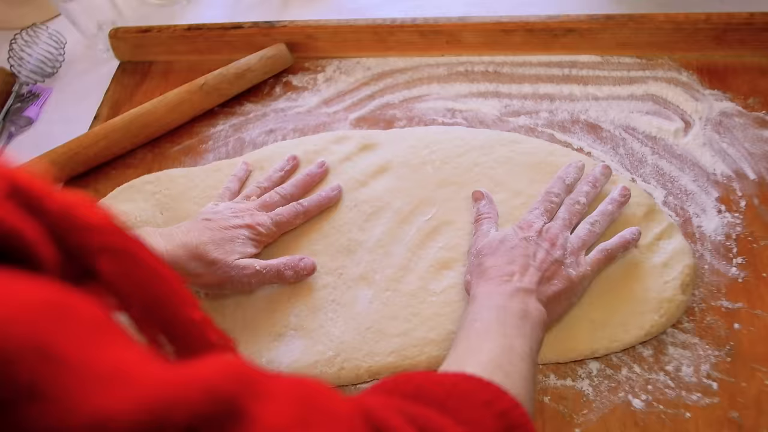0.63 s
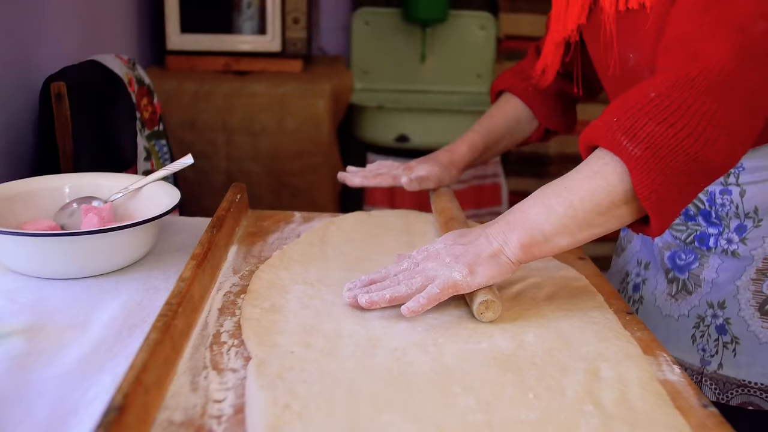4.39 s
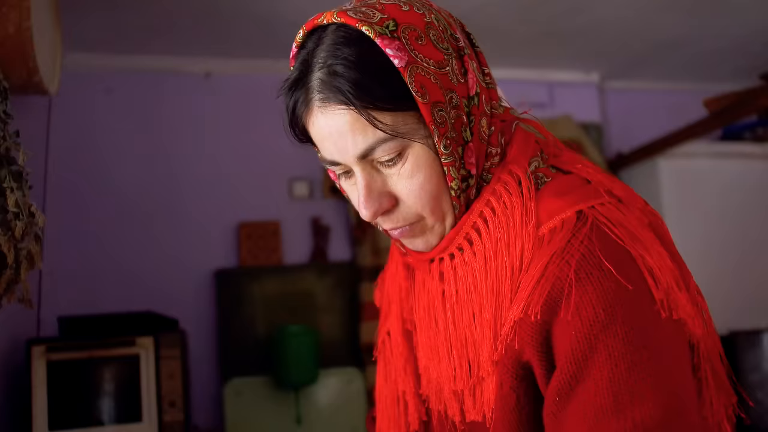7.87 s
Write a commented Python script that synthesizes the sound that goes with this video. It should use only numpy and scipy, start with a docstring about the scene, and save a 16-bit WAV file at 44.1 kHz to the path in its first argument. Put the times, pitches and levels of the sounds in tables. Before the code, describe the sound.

Hands pat and rub dough on a floured wooden board with low thumps and gritty swishes, then a wooden rolling pin rolls lightly, close up.

```python
"""A dull wooden knock and a hiss of flour, then hands pat and smooth dough on a board and roll it with a wooden pin.
Pushes set the board's modes booming; knocks and ticks are brief noise contacts, some ringing the wood.
Palms, skids and pin are shaped flour noise and wood scuff; the pin sings through its own modes, skin squeaks faintly.
A small kitchen answers the blows with short feedback echoes, over a quiet noise floor."""
import sys
import numpy as np
from scipy import signal
from scipy.fft import rfft, irfft, next_fast_len
from scipy.io import wavfile
from scipy.ndimage import map_coordinates

SR = 44100
rng = np.random.default_rng(int(sys.argv[2]) if len(sys.argv) > 2 else 0)


def dump_mix(stems):
    """Bounce the given channels to the path in sys.argv[1] as a 16-bit WAV at rate SR."""
    frames = np.atleast_2d(stems).T  # one column per channel
    limited = np.clip(frames, -1, 1)  # hard clip at full scale
    pcm = np.round(limited * 32767).astype(np.int16)
    wavfile.write(sys.argv[1], SR, pcm)


def voltage_ratio(level):
    """Linear amplitude factor for a level in decibels (scalar or array-like)."""
    return 10 ** (np.asarray(level, float) / 20)


N = 381024

# noise floor, tone colour: f/Hz, level per Hz/dB
QUIET_COLOUR = [(30, 5.5), (60, 12.5), (120, -13), (300, -14), (700, -17), (2000, -12.5), (8000, -21.5),
                (16000, -26)]
# flour hiss, tone colour: f/Hz, level per Hz/dB
FLOUR_COLOUR = [(1300, -2.5), (1800, -5), (2300, 6), (3200, -5), (4200, -1.5), (5600, -2), (11000, -10),
                (16000, -17)]
# scuff on the wood, tone colour: f/Hz, level per Hz/dB
SCUFF_COLOUR = [(300, -7.5), (700, -11.5), (1400, -17), (2800, -20.5)]
# modes of the floured board: f/Hz, level/dB, t60/s
BOARD_MODES = [(52.2, -21.5, 0.97), (82.6, -3, 0.37), (106.9, -3.5, 0.55), (151.1, 1.5, 0.11),
               (170.3, -5.5, 0.28), (195.5, -5.5, 0.15), (239, -4, 0.065), (295.4, -5.5, 0.12),
               (362, -8, 0.033), (424.3, -12, 0.088)]
# modes of knocked wood: f/Hz, level/dB, t60/s
WOOD_MODES = [(307, -2, .22), (528, -10, .12), (787, -3, .11), (1087, -8, .12), (1150, -2, .1),
              (1326, -5, .11), (1500, -4, .07), (1680, -7, .06), (2270, -10, .06), (2790, -13, .06)]
# modes of the rolling pin: f/Hz, level/dB, t60/s
PIN_MODES = [(872, -7, .07), (2010, 2, .036), (2790, -4, .008), (3400, 1, .022), (4910, -5, .02),
             (6520, -8, .016), (8090, -13, .014)]
# steady pressing stirs the board: t/s, rumble level/dB
LOAD_CURVE = [(0.0, -41), (1.73, -23), (2.45, -41.5), (2.76, -34), (3.7, -47.5), (4.35, -48), (5.03, -59.5),
              (5.44, -45), (5.74, -57), (5.95, -31), (6.13, -52), (6.5, -39.5), (7.3, -47.5), (8.0, -40.5),
              (8.36, -45.5), (8.64, -49)]
# skin squeaks along dough or pin: start t/s, stop t/s, level/dB, start f/Hz, stop f/Hz
SQUEAK_GLIDES = [(0.844, 0.892, -26, 3350, 3080), (2.89, 3.105, -43.5, 2630, 2790),
                 (3.062, 3.11, -39, 1193, 1184), (6.214, 6.375, -46, 2860, 2570)]
# small ticks and slaps: t/s, body level/dB, treble level against the body/dB, t60/s, body f/Hz
TICK_HITS = [(0.4205, -32, -1, 0.027, 2250), (0.7651, -16.5, -30, 0.075, 2160),
             (1.015, -17, -6.5, 0.031, 2240), (1.0997, -37, -24, 0.023, 1540),
             (1.3765, -7, -50, 0.024, 2650), (1.495, -18.5, -43, 0.057, 2960),
             (1.667, -5.5, -23, 0.015, 3300), (2.569, -14, -16, 0.026, 3200),
             (2.865, -42, 15.5, 0.017, 2600), (2.9725, -10.5, -15, 0.016, 2930),
             (3.109, -32.5, 19.5, 0.016, 3450), (3.1437, -13, -0.5, 0.021, 1980),
             (4.409, -33.5, 0, 0.052, 3170), (4.418, -27, -17, 0.023, 1880),
             (4.4855, -40.5, 16, 0.012, 1810), (4.7248, -25.5, -10, 0.091, 2980),
             (4.762, -14.5, -5, 0.042, 2670), (4.771, -24, -14, 0.15, 2640), (4.8162, -56, 28, 0.013, 3030),
             (5.094, -23, -12, 0.024, 2230), (5.292, -41, 6, 0.029, 3000), (5.31, -36, 2, 0.03, 2010),
             (5.7991, -21.5, -7, 0.023, 2150), (5.923, -42, 18.5, 0.019, 1920),
             (6.1616, -32.5, 1, 0.049, 3250), (6.178, -25.5, -6, 0.038, 1970),
             (6.532, -37.5, 18.5, 0.028, 3470), (6.9265, -32, -6, 0.022, 2120),
             (7.339, -35.5, 16, 0.023, 3140), (7.412, -46.5, 23, 0.018, 2050), (8.562, -28, -2, 0.03, 1500),
             (8.606, -39, -20, 0.024, 1500)]
# dull wooden knocks: t/s, level/dB, contact length/s, brightness/(dB per octave)
KNOCK_HITS = [(0.008, -20.5, 0.0021, -7), (0.141, -14.5, 0.0052, -4.5), (0.159, -21, 0.0035, 0),
              (0.662, -25.5, 0.023, -3.5), (2.32, -30, 0.029, 2.5), (2.365, -22, 0.0092, -9),
              (2.511, -22, 0.018, -3.5), (5.466, -25, 0.022, -6.5), (5.861, -24, 0.027, -3),
              (5.922, -18.5, 0.032, -2.5), (6.64, -29, 0.022, -7.5), (7.47, -25.5, 0.13, 3),
              (7.994, -25.5, 0.033, 6), (8.382, -13.5, 0.043, -0.5)]
# a hand or the pin lands and skids to rest: t/s, fall/s, flour hiss level/dB, scuff level/dB
SKID_STROKES = [(0.421, 0.052, -30, -32), (0.505, 0.28, -47, -35), (0.668, 0.16, -36, -29.5),
                (0.693, 0.056, -34.5, -19.5), (0.747, 0.024, -43, -22), (0.767, 0.068, -53, -16.5),
                (1.1, 0.13, -36.5, -24.5), (1.374, 0.083, -27, -26), (1.493, 0.11, -41, -28),
                (1.67, 0.03, -24, -13.5), (1.758, 0.13, -45, -27.5), (2.323, 0.1, -58, -30.5),
                (2.568, 0.32, -30, -25.5), (2.941, 0.96, -36, -37), (3.13, 0.08, -28.5, -22.5),
                (4.419, 0.49, -46, -43), (5.312, 0.1, -36.5, -33), (5.774, 0.011, -33.5, -42),
                (5.797, 0.51, -42, -35.5), (5.922, 0.059, -30, -23), (6.189, 0.1, -28, -35),
                (6.712, 0.093, -33.5, -30.5), (6.925, 0.034, -35, -38.5), (7.338, 0.066, -33, -31.5),
                (8.387, 0.067, -64, -26)]
# a cupped palm wipes across and lifts off: start t/s, stop t/s, flour hiss level/dB, scuff level/dB,
# hollow level/dB, hollow f/Hz at start, hollow f/Hz at stop
PALM_WIPES = [(0.138, 0.313, -27.5, -27, -30, 2380, 2636), (0.872, 1, -23.5, -42.5, -44, 3220, 2500),
              (2.055, 2.252, -33, -36.5, -34.5, 2577, 2864)]
# the pin is drawn along: fastest t/s, rise/s, fall/s, flour hiss level/dB, scuff level/dB, pin song level/dB
PIN_STROKES = [(3.08, 0.11, 0.16, -59, -40, -35), (4.53, 0.062, 0.15, -50, -64, -42),
               (4.69, 0.091, 0.21, -66, -59, -43.5), (5.0, 0.14, 0.14, -56, -77, -44.5),
               (5.105, 0.092, 0.042, -40.5, -65, -35.5), (5.41, 0.033, 0.076, -48, -43.5, -60),
               (5.555, 0.26, 0.05, -46, -45.5, -46), (5.662, 0.067, 0.039, -47, -50, -40),
               (5.815, 0.046, 0.024, -59, -53, -42), (6.03, 0.015, 0.012, -38, -69, -47),
               (6.21, 0.057, 0.27, -47, -50, -43.5), (6.385, 0.016, 0.035, -36, -35, -39),
               (6.435, 0.051, 0.063, -33, -50, -34), (6.545, 0.11, 0.2, -51, -47, -48),
               (6.71, 0.066, 0.081, -47.5, -51, -40.5), (7.05, 0.17, 0.25, -46.5, -42, -53.5),
               (7.59, 0.049, 0.069, -34.5, -70, -41), (7.66, 0.049, 0.072, -37.5, -72, -38),
               (7.92, 0.16, 0.49, -43.5, -49, -42.5), (8.19, 0.1, 0.079, -41.5, -44.5, -53),
               (8.3, 0.081, 0.11, -44, -57.5, -49.5), (8.516, 0.066, 0.21, -42.5, -52, -41)]
# palms slide over the dough: fastest t/s, rise/s, fall/s, flour hiss level/dB, scuff level/dB, hollow level/dB
PALM_STROKES = [(0.0, .05, 0.06, -33, -33, -61), (.595, 0.048, 0.042, -41, -29, -51),
                (1.237, 0.065, 0.17, -48.5, -44.5, -43), (1.596, 0.2, 0.043, -44.5, -37, -50),
                (1.806, 0.073, 0.12, -36, -52, -38.5), (2.76, 0.043, 0.055, -40, -60, -73),
                (3.222, 0.033, 0.032, -30, -36, -42), (3.4, 0.053, 0.16, -52, -46, -41),
                (3.53, 0.081, 0.088, -28.5, -32, -25.5), (3.61, 0.18, 0.072, -30.5, -33.5, -26),
                (3.76, 0.31, 0.08, -42.5, -46, -56), (4.1, 0.17, 0.17, -46, -50.5, -51),
                (4.24, 0.16, 0.018, -49.5, -53, -67)]
# pushes on the board: t/s, level/dB, firmness/(dB per octave)
BOARD_PUSHES = [(0.417, -27, 4), (0.592, -27, -10), (0.695, -7, 6.5), (0.747, -23.5, 4), (0.894, -9.5, 2.5),
                (1.011, -22, 9), (1.029, -3, 3), (1.21, -12.5, 3.5), (1.385, -5, 4.5), (1.565, -5.5, 4),
                (1.67, -2.5, 6), (1.728, -12.5, 3.5), (1.772, -19.5, 8), (1.845, -14, 2),
                (1.886, -25.5, 10), (1.952, -17.5, -7), (2.02, -22, 12), (2.18, -15, 7), (2.315, -32, 15),
                (2.569, -4.5, 5.5), (2.97, -10, 3), (3.126, -10, 7), (3.55, -8.5, -6.5), (4.251, -33, 12),
                (4.415, -15, -6.5), (5.09, -10.5, -5), (5.314, -20, -6), (5.779, -22.5, -17),
                (5.799, -19, -4.5), (5.916, -19.5, 5.5), (6.179, -15.5, 0.5), (6.316, -25, 3.5),
                (6.714, -6.5, -5), (6.93, -26, -13), (7.337, -16.5, -5.5), (7.511, -28.5, -3),
                (7.79, -25.5, -5.5), (7.844, -18, -11), (7.99, -18, 8), (8.56, -10.5, -6),
                (8.6, -3.5, -10.5)]

EDGE_DB = 20   # rise, fall and edge times are counted to this far below the top
SLIDE_ROUNDNESS, STOP_ROUNDNESS = 2.2, 1.86   # exponents of the swell and the dying away
WIPE_SCUFF_SHARE_DB, WIPE_LOW_DB = 1, -11   # fingertip rasp; wipes stir little below it


def rms_one(x):
    """Scale to rms 1."""
    return x / np.sqrt(np.mean(x ** 2) + 1e-20)


def band(x, low_hz, high_hz):
    """Second-order band-pass."""
    return signal.sosfilt(signal.butter(2, [low_hz, min(high_hz, .45 * SR)], "band", fs=SR, output="sos"), x)


def drift(rate_hz):
    """Slow random wander of rms 1, computed at every 40th sample."""
    r = np.exp(-80 * np.pi * rate_hz / SR)
    slow = signal.lfilter([1], [1, -2 * r, r * r], rng.standard_normal(N // 40 + 2002))[2000:]
    return np.interp(np.arange(N) / 40, np.arange(len(slow)), rms_one(slow))


def coloured(x, spectrum, patchy_db):
    """Half-octave bands of two noises in turn, each with its own level and flicker; rms 1."""
    hz, db = np.transpose(spectrum)
    edges = 25 * 2 ** np.arange(0, 9.6, .5)
    out = np.zeros(N)
    for k, (low, high) in enumerate(zip(edges, edges[1:])):
        if high > hz[0] and low < hz[-1]:
            level_db = np.interp(np.log(low * high) / 2, np.log(hz), db)
            out += voltage_ratio(level_db + patchy_db * drift(11.0)) * band(x[k % 2], low, high)
    return rms_one(out)


def grit(per_s, share):
    """Noise with flour grains on top, two unrelated draws."""
    grains = (rng.random((2, N)) < per_s / SR) * rng.laplace(0, 1, (2, N))
    return rng.standard_normal((2, N)) + share * rms_one(grains)


def sustained(force, modes, flicker_db):
    """A running force keeps the modes ringing, each with its own random flicker; rms 1."""
    out = np.zeros(N)
    for hz, level_db, t60 in modes:
        r, w = voltage_ratio(-60 / (t60 * SR)), 2 * np.pi * hz / SR
        ringing = rms_one(signal.lfilter([1], [1, -2 * r * np.cos(w), r * r], force))
        out += voltage_ratio(level_db + flicker_db * drift(19.0)) * ringing
    return rms_one(out)


def struck(modes, contact, tilt_db, scatter_db, length_s=0.54):
    """One blow: the modes ring from a contact force, tilted about the second mode; peak 1."""
    t = np.arange(int(length_s * SR)) / SR
    hz, level_db, t60 = np.transpose(modes)[:, :, None]
    strength_db = level_db + tilt_db * np.log2(hz / hz[1]) + scatter_db * rng.standard_normal(hz.shape)
    signs = (-1.) ** np.arange(len(hz))[:, None]
    ringing = np.sum(signs * voltage_ratio(strength_db - 60 * t / t60) * np.sin(2 * np.pi * hz * t), axis=0)
    blow = signal.fftconvolve(ringing, contact)[:len(t)]
    return blow / np.max(np.abs(blow))


def add(out, s, sound):
    """Mix a sound in at a time."""
    i = max(round(s * SR), 0)
    out[i:i + len(sound)] += sound[:max(N - i, 0)]


def in_time(rows):
    """Each column of a curve at every sample."""
    s, *columns = np.transpose(rows)
    return [np.interp(np.arange(N) / SR, s, c) for c in columns]


def strokes(rows, roundness, stop_roundness):
    """Power of each level column in time: every stroke swells to its top and dies away."""
    out = np.zeros((len(rows[0]) - 3, N))
    for s, rise_s, fall_s, *levels_db in rows:
        rise_s, fall_s = max(rise_s, .005), max(fall_s, .005)
        i = np.arange(max(int((s - 3 * rise_s) * SR), 0), min(int((s + 3 * fall_s) * SR), N))
        distance_s = np.abs(i / SR - s)
        swell = (distance_s / rise_s) ** roundness
        dying = (distance_s / fall_s) ** stop_roundness
        away = np.where(i / SR < s, swell, dying)
        out[:, i] += voltage_ratio(np.array(levels_db)[:, None] - EDGE_DB * away) ** 2
    return out


def slow_pair(cut_hz):
    """Two low-passed noises that turn into narrow noise once carried on a pitch."""
    low_pass = signal.butter(2, cut_hz, fs=SR, output="sos")
    return rms_one(signal.sosfilt(low_pass, rng.standard_normal((2, N))))


def gliding(air, start, stop, start_hz, stop_hz):
    """Narrow noise around a pitch that glides from start to stop."""
    pitch_hz = np.interp(np.arange(N) / SR, [start, stop], [start_hz, stop_hz])
    phase = 2 * np.pi * np.cumsum(pitch_hz) / SR
    return air[0] * np.cos(phase) + air[1] * np.sin(phase)


def quiet_floor():
    """Soft coloured noise lies under everything."""
    return voltage_ratio(-49) * coloured(rng.standard_normal((2, N)), QUIET_COLOUR, patchy_db=.8)


def kitchen(x):
    """Eight feedback delays, duller on every round."""
    t60_s, wall_cut_hz = 0.2, 870
    size = next_fast_len(N + SR)
    w = 2 * np.pi * np.arange(size // 2 + 1) / size
    walls = 1 / (1 + 1j * w * SR / (2 * np.pi * wall_cut_hz))
    echo = 0
    for k, lag_s in enumerate(np.geomspace(.011, .037, num=8)):
        loop = voltage_ratio(-60 * lag_s / t60_s) * walls * np.exp(-1j * w * lag_s * SR)
        echo = echo + (-1) ** k * loop / (1 - loop)
    return irfft(rfft(x, size) * echo, size)[:N] / np.sqrt(8)


def stirred_board():
    """The pressing load stirs the board's low modes with unsteady noise."""
    stirring = rng.standard_normal(N) * voltage_ratio(4 * drift(16))
    return voltage_ratio(in_time(LOAD_CURVE)[0]) * sustained(stirring, BOARD_MODES, flicker_db=5.0)


def squeaks():
    """Skin squeaks: narrow noise around a gliding pitch."""
    edge_s = 0.026
    t, out, air = np.arange(N) / SR, 0, slow_pair(160)
    for start, stop, level_db, start_hz, stop_hz in SQUEAK_GLIDES:
        outside = np.maximum(np.maximum(start - t, t - stop), 0) / edge_s
        level = voltage_ratio(level_db - np.minimum(EDGE_DB * outside, 200))
        out = out + level * gliding(air, start, stop, start_hz, stop_hz)
    return out


def ticks():
    """A short dying puff in three parts: a body around its own pitch, a crack and a treble snap."""
    out, t = np.zeros(N), np.arange(int(.15 * SR)) / SR
    for s, level_db, treble_db, t60, body_hz in TICK_HITS:
        puff = rng.standard_normal((2, len(t))) * voltage_ratio(-60 * t / max(t60, .003))
        puff[:, 0] += 3.0     # hard first touch
        body = band(puff[0], body_hz / 1.35, body_hz * 1.25)
        treble = band(band(puff[1], 5400, 14000), 5400, 14000)
        crack = band(puff[1] * voltage_ratio(-60 * t / 0.004), 1600.0, 7000.0)     # the first instant is broad
        add(out, s, voltage_ratio(level_db) * body / np.max(np.abs(body)))
        add(out, s, voltage_ratio(level_db + 0.26 * treble_db + 6.0) * crack / np.max(np.abs(crack)))
        add(out, s, voltage_ratio(level_db + treble_db) * treble / np.max(np.abs(treble)))
    return out


def knocks():
    """Wood on wood: a sharp first touch, then a scuffed contact of some length into the middle modes."""
    free_ring_s = .03   # briefer knocks come from a hand that stays on the wood and damps it
    out, t = np.zeros(N), np.arange(int(.1 * SR)) / SR
    for s, level_db, contact_s, bright_db in KNOCK_HITS:
        contact = rng.standard_normal(len(t)) * np.exp(-t / max(contact_s, 1e-3))
        contact[0] += 35.0
        damped = np.array(WOOD_MODES) * [1, 1, np.clip(contact_s / free_ring_s, .3, 1)]
        dense = band(band(contact, 550, 2200), 450, 2600)     # modes too close to tell apart
        add(out, s, voltage_ratio(level_db - 8. + bright_db) * dense)
        add(out, s, voltage_ratio(level_db) * struck(damped, contact, bright_db, scatter_db=2.5, length_s=.3))
    return out


def pin_song():
    """The pin's modes, kept ringing by friction; pitch sways a little and loudness swells, both at random."""
    wander_s, swell_db = .00012, 1.4
    song = sustained(rng.standard_normal(N), PIN_MODES, flicker_db=2.4)
    swayed = np.arange(N) + wander_s * SR * drift(8)
    swells = rms_one(voltage_ratio(swell_db * drift(12)))
    return swells * map_coordinates(song, [swayed], order=3, mode="nearest")


def wipes(flour, fine):
    """Flour hiss, thin below the gliding hollow of the cupped palm; also the power of its scuff."""
    rise_s, fall_s, sag_db, bright_db = 0.12, 0.074, 3, -2
    t, out, scuff, air = np.arange(N) / SR, 0, 0, slow_pair(780)
    flour = flour + (voltage_ratio(bright_db) - 1) * fine
    for start, stop, hiss_db, scuff_db, hollow_db, start_hz, stop_hz in PALM_WIPES:
        corners = [start - 3 * rise_s, start, stop, stop + 3 * fall_s]
        shape_db = np.interp(t, corners, [-3 * EDGE_DB, 0, -sag_db, -3 * EDGE_DB], left=-200, right=-200)
        shape = voltage_ratio(shape_db)
        # the hiss starts at half the mean pitch
        edge = signal.butter(4, 0.5 * (start_hz + stop_hz) / 2, "high", fs=SR, output="sos")
        hiss = voltage_ratio(hiss_db) * signal.sosfilt(edge, flour)
        hollow = voltage_ratio(hollow_db) * gliding(air, start, stop, start_hz, stop_hz)
        out = out + shape * (hiss + hollow)
        scuff = scuff + (voltage_ratio(scuff_db) * shape) ** 2
    return out, scuff


def wood_scuff(steady_power, wipe_power):
    """Gritty noise of skin and pin on wood, plus the rasp of fingertips in the wipes."""
    wood = coloured(grit(200., 0.65), SCUFF_COLOUR, patchy_db=0.4)
    rasp = rms_one(band(band(wood, 537, 1730), 537, 1730))
    low = np.sqrt(steady_power + voltage_ratio(2 * WIPE_LOW_DB) * wipe_power) * wood
    return low + voltage_ratio(WIPE_SCUFF_SHARE_DB) * np.sqrt(wipe_power) * rasp


def rubbing():
    """Palms, skids and pin share one bed of flour noise, each shaping it by its own strokes."""
    palm_bright_db, pin_bright_db = -4.5, 0.5   # fine flour above 6 kHz
    rest_hiss_db, rest_scuff_db = -69, -72.5   # resting hands still stir
    palm_hiss, palm_scuff, hollow = strokes(PALM_STROKES, SLIDE_ROUNDNESS, STOP_ROUNDNESS)
    pin_hiss, pin_scuff, song = strokes(PIN_STROKES, SLIDE_ROUNDNESS, STOP_ROUNDNESS)
    skids = [(s, .007, *rest) for s, *rest in SKID_STROKES]   # rise of 7 ms
    skid_hiss, skid_scuff = strokes(skids, 0.88, 0.75)

    flour = coloured(grit(900., 0.43), FLOUR_COLOUR, patchy_db=2.5)
    fine = band(flour, 6000, 18000)
    rubbed, wipe_scuff = wipes(flour, fine)
    hand_hiss = palm_hiss + skid_hiss + voltage_ratio(2 * rest_hiss_db)
    rubbed += np.sqrt(hand_hiss) * (flour + (voltage_ratio(palm_bright_db) - 1) * fine)
    pin_flour = band(flour, 3200, SR / 2)   # under the pin only fine flour hisses
    rubbed += np.sqrt(pin_hiss) * (pin_flour + (voltage_ratio(pin_bright_db) - 1) * fine)
    rubbed += np.sqrt(hollow) * rms_one(band(rng.standard_normal(N), 1790, 3640))   # hollow of the palm
    rubbed += np.sqrt(song) * pin_song() + squeaks()
    rubbed += wood_scuff(palm_scuff + pin_scuff + skid_scuff + voltage_ratio(2 * rest_scuff_db), wipe_scuff)
    uneven = voltage_ratio(1.1 * drift(25))     # the slide catches and frees
    return uneven * rubbed


def pushes():
    """A soft palm or the pin's weight sets the board booming; the board comes back down a moment later."""
    rebound_s, rebound_db = 0.033, -3
    rebound_per_firmness = 0.14   # firm pushes bounce more
    out, t = np.zeros(N), np.arange(int(.1 * SR)) / SR
    for s, level_db, firm_db in BOARD_PUSHES:
        palm = np.hanning(int(0.0021 * SR * voltage_ratio(-.6 * firm_db)) + 3)     # softer pushes stay in contact longer
        start = s - 0.606 * len(palm) / SR - .0025
        add(out, start, -voltage_ratio(level_db) * struck(BOARD_MODES, palm, firm_db, scatter_db=.8))
        bounce_db = level_db + rebound_db + rebound_per_firmness * firm_db
        add(out, start + rebound_s, -voltage_ratio(bounce_db) * struck(BOARD_MODES, palm, firm_db, scatter_db=5.5))
        slap = band(rng.standard_normal(len(t)) * voltage_ratio(-60 * t / 0.16), 200.0, 705.0)     # dense short wood modes
        add(out, s, voltage_ratio(level_db - 4.0 + 1.16 * firm_db) * slap)
    return band(out, 22.0, 2250)     # the pushes sound only between the deepest bass and the upper mids


def scene():
    """All sources close to the microphone, a little room on the blows, a quiet floor."""
    blows = pushes() + knocks() + ticks()
    room = voltage_ratio(-8) * kitchen(blows)
    return np.tile(blows + room + rubbing() + stirred_board() + quiet_floor(), (2, 1))


def roll_off(x):
    """The treble ends steeply here."""
    return signal.sosfilt(signal.butter(12, 15950, fs=SR, output="sos"), x)


def record(dry):
    """Two close microphone ports: a hair of lag and a little bass differ; deep bass is cut, peaks clip."""
    lag_db, bass_side_db = -25.5, -29.5
    mid = signal.sosfilt(signal.butter(2, 42., "high", fs=SR, output="sos"), dry[0])
    slope = irfft(1j * np.linspace(0, np.pi, N // 2 + 1) * rfft(mid), N)   # a small share of it acts as lag
    bass = signal.lfilter([.0016], [1, -1.92, .9216], mid)
    side = voltage_ratio(lag_db) * slope - voltage_ratio(bass_side_db) * bass
    both = np.clip([mid + side, mid - side], -1, 1)
    return roll_off(both)


dry = scene()
out = record(dry)
dump_mix(out)
```